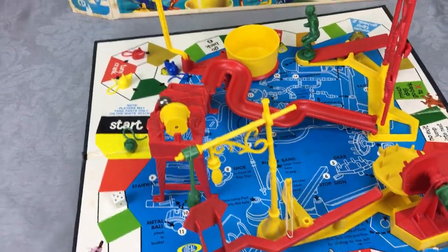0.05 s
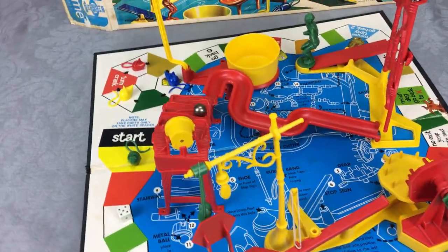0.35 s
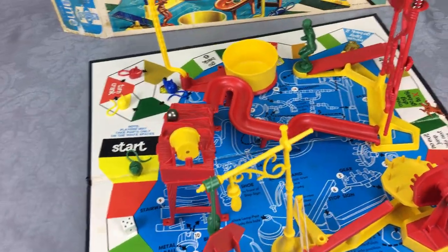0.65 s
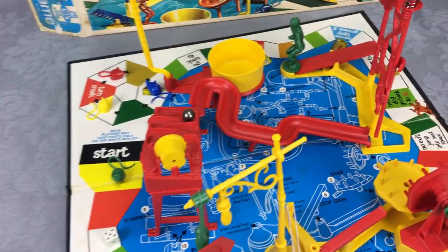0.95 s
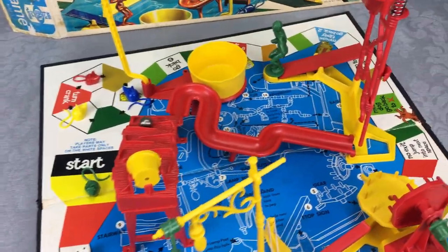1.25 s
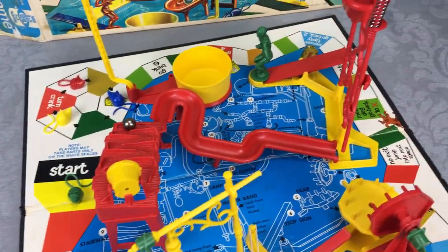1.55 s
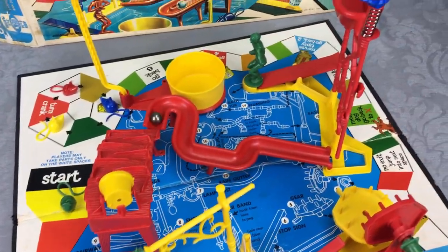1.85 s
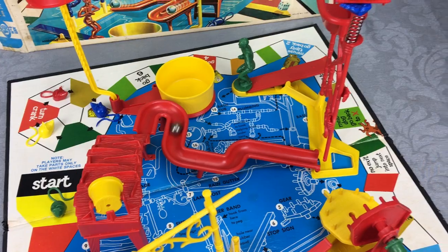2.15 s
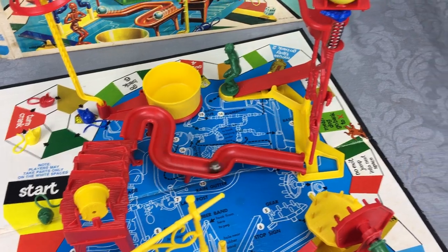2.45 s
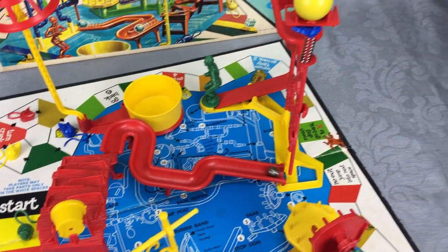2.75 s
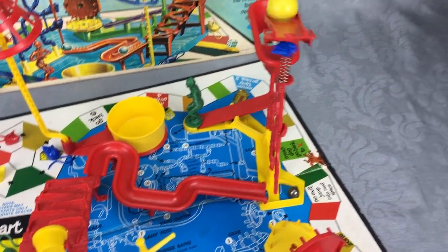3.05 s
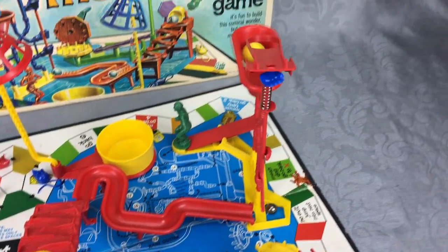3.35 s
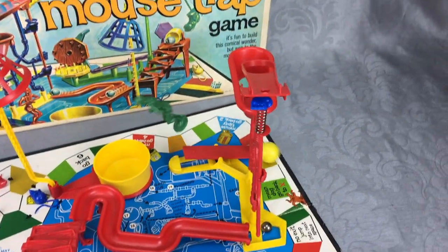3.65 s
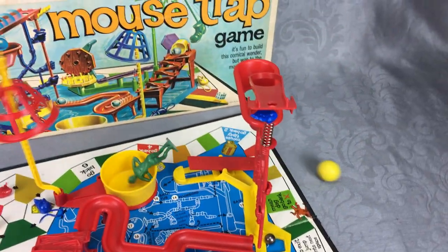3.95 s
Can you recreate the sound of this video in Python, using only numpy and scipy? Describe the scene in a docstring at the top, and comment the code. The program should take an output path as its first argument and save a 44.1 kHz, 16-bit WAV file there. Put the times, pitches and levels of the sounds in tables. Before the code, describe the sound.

Heard up close in a small room, a metal ball clicks down plastic steps and rolls softly through a winding chute. A louder run of hollow plastic clatters follows, ending with pieces knocking onto a cardboard game board.

```python
"""A small steel ball clacks down the plastic stairs of a board game, then rolls along a winding chute,
making the plastic murmur and the board hum. It knocks a sprung pole, which jolts a second ball loose.
That ball rattles through a tub and drops on a seesaw, and last the pieces land on the cardboard board.
Each hit is a short crack plus the ringing of the part that was struck. Heard close by in a small room."""
import sys
import numpy as np
from scipy import signal
from scipy.fft import rfft, irfft
from scipy.io import wavfile
from scipy.ndimage import uniform_filter1d

SR = 44100
rng = np.random.default_rng(int(sys.argv[2]) if len(sys.argv) > 2 else 0)


def digitize_waveform(pressure):
    """Quantize a signal to 16-bit integers and store it at the path in sys.argv[1].

    Rows of a 2-D input are taken as channels; values are limited to [-1, 1].
    """
    field = np.atleast_2d(pressure).T
    bounded = np.clip(field, -1, 1)
    quanta = np.round(bounded * 32767).astype(np.int16)
    wavfile.write(sys.argv[1], SR, quanta)


N = 176400
HIT_TIME = np.arange(SR // 3) / SR
FILTER_HZ = np.fft.rfftfreq(2048, 1 / SR)


def gain(db):
    """Turns decibels into a multiplier."""
    return 10 ** (np.asarray(db) / 20)


def unit_level(x):
    """Scales a signal to an average power of 1."""
    return x / np.sqrt(np.mean(x ** 2) + 1e-20)


def at_pitch(points, hz):
    """Looks up a value between the pitches of a table."""
    pitch_hz, value = np.transpose(points)
    return np.interp(np.log(hz + 1), np.log(pitch_hz), value)


def loudness(points):
    """A volume curve that fades to silence just outside its first and last times."""
    time_s, db = np.transpose(points)
    t = np.arange(N) / SR
    fade = np.clip(np.minimum(t - time_s[0], time_s[-1] - t) * 20 + 2, 0, 1)
    return gain(np.interp(t, time_s, db)) * fade


def add(mix, start_s, sound):
    """Mixes a sound in at its start time."""
    part = mix[max(round(start_s * SR), 0):][:len(sound)]
    part += sound[:len(part)]


def wobble(n, size):
    """Random values that wander smoothly; a bigger size wanders more slowly."""
    return unit_level(uniform_filter1d(uniform_filter1d(rng.standard_normal(n), size), size))


def shape_tone(x, db):
    """Turns each pitch in FILTER_HZ up or down by db."""
    cepstrum = irfft(np.log(gain(db)))
    half = len(cepstrum) // 2
    cepstrum[1:half] *= 2
    cepstrum[half + 1:] = 0  # the filter rings only after a sound, never before
    return signal.fftconvolve(x, irfft(np.exp(rfft(cepstrum))))[:len(x)]


def die_away(t, fade_s):
    """A fade that falls by 60 dB every fade_s."""
    return np.exp(-np.log(1000) * t / fade_s)


def fading_noise(t, fades):
    """Noise whose low, middle and high bands each fade at their own speed."""
    hz = np.fft.rfftfreq(len(t), 1 / SR)
    centres_hz, fades_s = np.transpose(fades)
    spectrum = rfft(rng.standard_normal(len(t)))
    return sum(irfft(spectrum * at_pitch(np.c_[centres_hz, band], hz), len(t)) * die_away(t, fade_s)
               for band, fade_s in zip(np.eye(len(fades_s)), fades_s))


def hiss(tone):
    """Steady noise shaped by a tone table."""
    weights = gain(at_pitch(tone, np.fft.rfftfreq(N, 1 / SR)))
    return unit_level(irfft(rfft(rng.standard_normal(N)) * weights, N))


# tone of the room's air: pitch_hz, level_db
AIR_TONE = [(20, -6), (70, 2.5), (400, -18), (1000, -26), (12000, -47.5)]

def room_air(level_db=-52.5):
    """The air in the room is a faint, low rush."""
    return gain(level_db) * hiss(AIR_TONE)


# how long the room rings: pitch_hz, fade_s
ECHO_FADES = [(150, 0.39), (4000, 0.17), (15000, 0.16)]

def room_echo(sound, level_db=-16.5, rise_s=0.0064):
    """The small room adds a short, smooth echo."""
    t = np.arange(SR // 2) / SR
    tail = fading_noise(t, ECHO_FADES) * np.minimum(t / rise_s, 1) ** 2
    return gain(level_db) * signal.fftconvolve(sound, tail / np.linalg.norm(tail))[:N]


# loudness of the board's hum: time_s, level_db
HUM_LEVELS = [(0, -58.5), (2.35, -54.5), (2.53, -47), (2.7, -73)]

def board_hum(pitch_hz=88.6, width_hz=8.9):
    """The rolling ball stirs the board's lowest note, like a drum skin."""
    offset = (np.fft.rfftfreq(N, 1 / SR) - pitch_hz) / width_hz
    hum = irfft(rfft(rng.standard_normal(N)) / (1 + offset ** 2), N)
    return loudness(HUM_LEVELS) * unit_level(hum)


# loudness of the brush: time_s, level_db
BRUSH_LEVELS = [(2.25, -105), (2.305, -54), (2.38, -91)]
# its tone: pitch_hz, level_db
BRUSH_TONE = [(2000, -22), (7000, 1), (15500, -12)]

def wall_brush():
    """The ball brushes the wall in the bend with a brief hiss."""
    return loudness(BRUSH_LEVELS) * hiss(BRUSH_TONE)


def hollow_boost(notes, boost_db=5, width_hz=75):
    """A hollow part boosts the pitches near its own notes; gives dB at FILTER_HZ."""
    offset = (FILTER_HZ - np.transpose(notes)[0][:, None]) / width_hz
    return boost_db * (1 / (1 + offset ** 2)).max(0)


# loudness of the rolling: time_s, level_db
STAIR_ROLL_LEVELS = [(0, -47.5), (.32, -49.5), (.5, -50), (.62, -48.5), (.86, -57.5), (.98, -44),
                     (1.27, -56), (1.53, -57), (1.6, -49), (1.76, -43.5), (1.95, -56.5)]
CHUTE_ROLL_LEVELS = [(1.9, -65), (2.04, -59.5), (2.14, -49.5), (2.26, -48), (2.34, -54), (2.56, -48),
                     (2.87, -55.5)]
# its tone: pitch_hz, level_db
STAIR_ROLL_TONE = [(200, -4), (520, -5.5), (840, -0.5), (1150, 0.5), (1700, -14), (3600, -13),
                   (5500, -22.5), (12000, -43)]
CHUTE_ROLL_TONE = [(450, -8.5), (700, 2), (1150, 5.5), (1700, -2), (7000, -19), (15000, -32.5)]

def rolling(levels, tone, notes, bumps_per_s=170, spread_db=3.8, split_hz=1500):
    """The rolling ball keeps the plastic murmuring; small uneven bumps tick on top."""
    bumps = (rng.random(N) < bumps_per_s / SR) * gain(spread_db * np.minimum(rng.exponential(1, N), 4))
    tick = rng.standard_normal(len(HIT_TIME)) * die_away(HIT_TIME, fade_s=0.045)
    ticks = unit_level(signal.fftconvolve(bumps * rng.choice([-1, 1], N), tick)[:N])
    murmur = signal.lfilter(*signal.butter(2, split_hz, "low", fs=SR), rng.standard_normal(N))
    rattle = signal.lfilter(*signal.butter(2, split_hz, "high", fs=SR), ticks)
    tone_db = at_pitch(tone, FILTER_HZ) + hollow_boost(notes)
    return loudness(levels) * unit_level(shape_tone(murmur + rattle, tone_db))


# dull knocks on the board: start_s, level_db
BOARD_KNOCKS = [(2.9486, -20.5), (3.018, -25), (3.6988, -18), (3.9432, -20)]

def board_knocks(end_hz=900, peak_s=0.0007, slide_s=0.0012):
    """A ball bends the board; the high pitches arrive first, so each knock slides down."""
    out, t = np.zeros(N), HIT_TIME
    cycles = np.cumsum(end_hz * (1 + 1.1 * np.exp(-t / slide_s))) / SR
    knock = (t / peak_s) * np.exp(1 - t / peak_s) * np.sin(2 * np.pi * cycles)
    for start_s, db in BOARD_KNOCKS:
        add(out, start_s, gain(db) * knock)
    return out


# tone of each part's noisy ring: pitch_hz, stairs_db, chute_db, pole_db, tub_db, seesaw_db, board_db
PART_TONES = [(215, -1.5, -4.5, -3.5, -15.5, -7, -2.5), (485, -6.5, -5, -7.5, -8.5, -16.5, -11),
              (933, 8, 5.5, 5.5, 0, 2.5, -1), (1160, 10, 4, 3.5, -4, 3, -1.5),
              (1710, 5, 4, -0.5, -1.5, 1, 1.5), (2310, 7, 3.5, 1.5, 2, 1, -1),
              (3550, 5.5, 2, -1.5, -6, 3, 0.5), (6160, -8.5, 1, -5.5, -1.5, 4, 2.5),
              (15600, -24.5, -11, -16, -16, -7, -16)]
# how long that ring lasts, before ring_stretch multiplies it: pitch_hz, fade_s
RING_FADES = [(300, 0.15), (3500, 0.13), (15000, 0.067)]

def struck(hits, notes, tone_column, note_fade_s, crack_s, ring_stretch, steps=(), step_db=-0.5):
    """Each hit gives a short crack, a noisy ring and the part's own clear notes."""
    out, t, bins = np.zeros(N), HIT_TIME, len(FILTER_HZ)
    ripple_db = 1.5 * wobble(bins, size=6) * np.minimum(FILTER_HZ / 3000, 1)  # many tiny resonances
    part_db = at_pitch(np.array(PART_TONES)[:, [0, tone_column]], FILTER_HZ) + ripple_db + 4.5
    rise = 1 - np.exp(-t / 0.00062)
    for start_s, level_db, bass_db, treble_db, ring_db in hits:
        step_note = [(step_hz, step_db) for reached_s, step_hz in steps if reached_s <= start_s][-1:]
        ringing = list(notes) + step_note
        hz, db = np.transpose(ringing)[:, :, None]
        touch = [(1100, bass_db), (2200, 0), (3800, 0), (6500, treble_db)]
        crack = rng.standard_normal(len(t)) * np.exp(-(t / crack_s) ** 2)
        # each spot that is hit favours different pitches
        spot_db = 1.8 * wobble(bins, size=10) * np.minimum(FILTER_HZ / 1000, 1)
        buzz = unit_level(gain(3 * wobble(len(t), size=90)))  # loose joints chatter
        ring = buzz * fading_noise(t, np.array(RING_FADES) * [1, ring_stretch])
        tone_db = part_db + hollow_boost(ringing) + spot_db + at_pitch(touch, FILTER_HZ)
        noise = shape_tone(crack + gain(ring_db) * ring, tone_db)
        note_spot_db, detune = rng.standard_normal((2, len(hz), 1))
        phase = 2 * np.pi * (hz * (1 + 0.0048 * detune) * t + rng.random(hz.shape))
        tones = gain(db + at_pitch(touch, hz) + note_spot_db) * die_away(t, note_fade_s) * np.sin(phase)
        add(out, start_s, gain(level_db) * rise * (noise + tones.sum(0)))
    return out


# hits on each part: start_s, level_db, bass_db, treble_db, ring_db
POLE_CLACKS = [(2.864, -39, -12, 11, 1), (2.873, -25, -1, 5.5, 3), (2.962, -22, 1.5, 12, -4.5),
               (2.976, -21.5, -1, -10, -9), (3.111, -40, -4.5, 7.5, 9.5), (3.146, -32, -6, 4.5, 5),
               (3.181, -34, 1.5, 4.5, -3)]
TUB_CLACKS = [(3.227,-12,-0.5,-4,-10), (3.279,-41.5,-1,-5,9.5), (3.3455,-18.5,-14,-3,-16),
              (3.371,-32,4,-2,-37), (3.423,-26,-2,1.5,-4), (3.433,-34.5,5,-6.5,6), (3.464,-28.5,-1,1.5,-7),
              (3.488,-26,1.5,-7,-5.5)]
SEESAW_CLACKS = [(3.614, -25.5, 4, 5, 0.5), (3.643, -14, 1.5, -8.5, -14.5), (3.651, -20, 4, -0.5, -7.5),
                 (3.697, -35, 15.5, -4.5, -1.5)]
BOARD_CLACKS = [(3.843, -30.5, 2.5, 12, -35), (3.855, -19, 4.5, -0.5, -10.5), (3.87, -36, 16, 7, -5.5),
                (3.939, -28.5, 8, -3, -4), (3.987, -28, -1, 0.5, -30)]
# notes each part rings with: pitch_hz, level_db
POLE_NOTES = [(1050, -9), (1940, -14), (2620, -10), (3410, -5.5)]
TUB_NOTES = [(1330, -6), (1870, -16), (2280, -9), (2500, -13.5), (3336, -13.5), (3900, -12.5), (6080, -10)]
SEESAW_NOTES = [(1430, 0), (1830, 3), (2112, -6), (5600, 0.5), (6300, -18), (7220, 4.5)]
BOARD_NOTES = [(1098, 2.5), (2105, 2), (4800, 0)]

def chain_reaction():
    """The pole, tub, seesaw and board are hit in turn, and each rings in its own way."""
    pole = struck(POLE_CLACKS, POLE_NOTES, 3, note_fade_s=0.084, crack_s=0.0041, ring_stretch=1.3)
    tub = struck(TUB_CLACKS, TUB_NOTES, 4, note_fade_s=0.076, crack_s=0.0094, ring_stretch=2.14)
    seesaw = struck(SEESAW_CLACKS, SEESAW_NOTES, 5, note_fade_s=0.027, crack_s=0.0075, ring_stretch=1)
    board = struck(BOARD_CLACKS, BOARD_NOTES, 6, note_fade_s=0.048, crack_s=0.0057, ring_stretch=2.23)
    return pole + tub + seesaw + board


# bounces in the chute: start_s, level_db, treble_db
CHUTE_BOUNCES = [(1.797,-28,-1.5), (1.822,-34,-5), (1.835,-22,-16.5), (1.895,-22,3), (2.221,-63.5,14),
                 (2.575,-31,2), (2.646,-34.5,-3.5)]
# notes of the chute: pitch_hz, level_db
CHUTE_NOTES = [(1136, -17), (1720, -21), (2010, -6), (3260, -16), (4450, -22), (6260, -12)]

def ball_in_chute(ring_db=-3.5):
    """The steel ball drops into the chute and clicks against the plastic."""
    hits = [(start_s, db, 0, treble_db, ring_db) for start_s, db, treble_db in CHUTE_BOUNCES]
    return struck(hits, CHUTE_NOTES, 2, note_fade_s=0.046, crack_s=0.0035, ring_stretch=0.51)


# bounces on the stairs: start_s, level_db, treble_db
STAIR_BOUNCES = [(0.073,-29.5,7.5), (0.102,-34,2.5), (0.119,-36.5,4), (0.1429,-32,1), (0.173,-38.5,1.5),
                 (0.254,-51.5,-2), (0.334,-23,2.5), (0.37,-30,4.5), (0.3988,-27.5,7.5), (0.411,-35,5),
                 (0.422,-34.5,4), (0.441,-41,5), (0.626,-46,0), (0.651,-32.5,10), (0.675,-32,4),
                 (0.7401,-29,-5), (0.746,-29.5,2.5), (0.772,-33,0.5), (0.988,-48.5,2), (1.0111,-23.5,2),
                 (1.065,-36.5,11), (1.0962,-18.5,6), (1.131,-46.5,17), (1.148,-32,4.5), (1.211,-47,1),
                 (1.338,-54.5,3.5), (1.425,-28.5,2), (1.4701,-35.5,0.5), (1.563,-28,-0.5), (1.592,-38.5,-1),
                 (1.62,-48,6), (1.65,-48.5,1), (1.686,-42.5,2), (1.726,-51,7)]
# notes of the whole staircase: pitch_hz, level_db
STAIR_NOTES = [(700, -10.5), (1750, -21), (2570, -5), (3320, -4.5), (3630, -6.5)]
# the main note of each lower stretch of stairs: reached_s, pitch_hz
STEP_NOTES = [(0.29, 1310), (0.58, 1174), (0.95, 1335), (1.05, 1127), (1.52, 1220)]

def ball_on_stairs(rebound_db=-21.5, firm_db=-22, ring_db=-3):
    """The steel ball clacks down the stairs, with a light rebound after each bounce."""
    delays_s = 0.013 * rng.uniform(1, 2, len(STAIR_BOUNCES))
    rebounds = [(start_s + delay_s, db + rebound_db, treble_db)
                for (start_s, db, treble_db), delay_s in zip(STAIR_BOUNCES, delays_s)]
    # bounces softer than firm_db get a bigger share of bass, so they sound duller
    hits = [(start_s, db, 0.51 * (firm_db - db), treble_db, ring_db)
            for start_s, db, treble_db in list(STAIR_BOUNCES) + rebounds]
    return struck(hits, STAIR_NOTES, 1, note_fade_s=0.045, crack_s=0.0047, ring_stretch=0.55,
                  steps=STEP_NOTES)


def scene():
    """The whole game, with the room's echo and quiet air."""
    roll = rolling(STAIR_ROLL_LEVELS, STAIR_ROLL_TONE, STAIR_NOTES)
    roll += rolling(CHUTE_ROLL_LEVELS, CHUTE_ROLL_TONE, CHUTE_NOTES)
    game = roll + ball_on_stairs() + ball_in_chute() + chain_reaction() + board_knocks() + wall_brush()
    return (game + room_echo(game) + board_hum() + room_air())[None]


def record(dry):
    """The microphone drops the rumble below 66 Hz and the treble above 16050 Hz."""
    no_rumble = signal.sosfilt(signal.butter(2, 66, "high", fs=SR, output="sos"), dry)
    treble_cut = signal.firwin(255, 16050, window=("kaiser", 9), fs=SR)
    return signal.oaconvolve(no_rumble, treble_cut[None], "same")


dry = scene()
out = record(dry)
digitize_waveform(out)
```